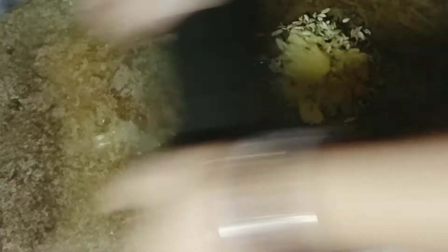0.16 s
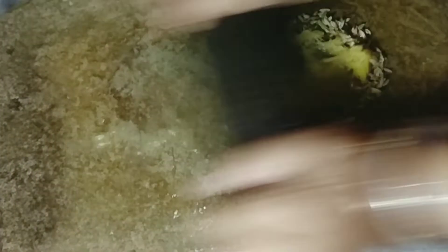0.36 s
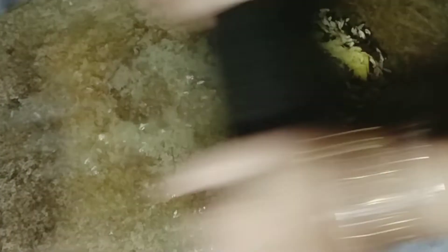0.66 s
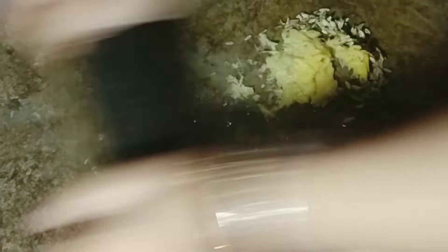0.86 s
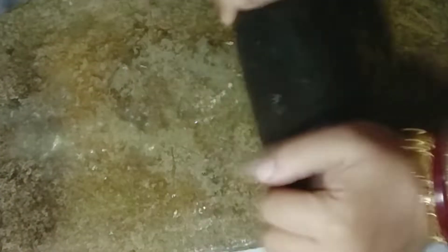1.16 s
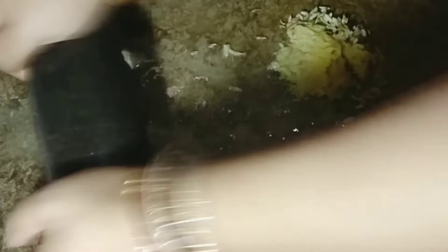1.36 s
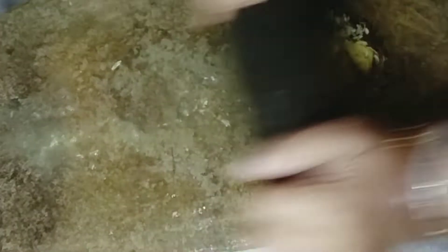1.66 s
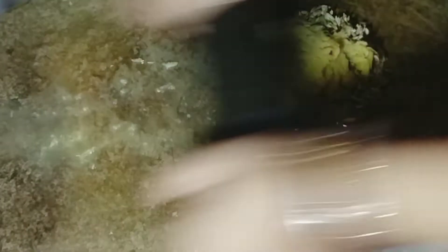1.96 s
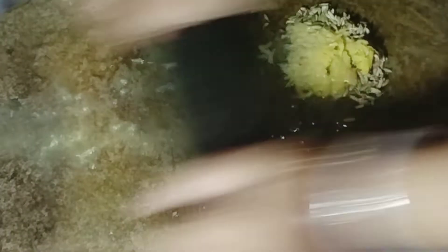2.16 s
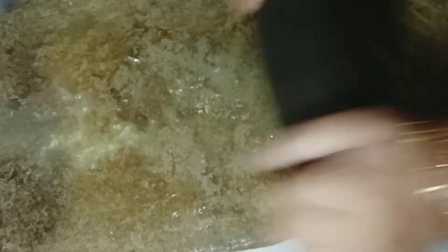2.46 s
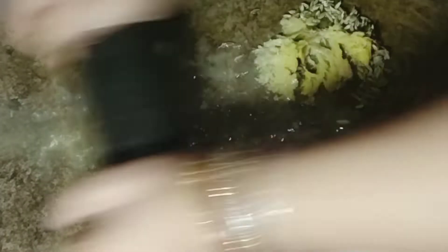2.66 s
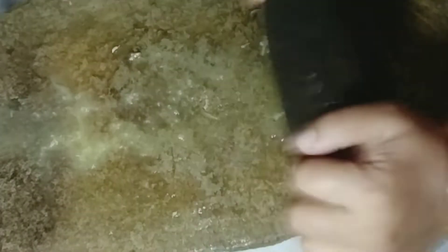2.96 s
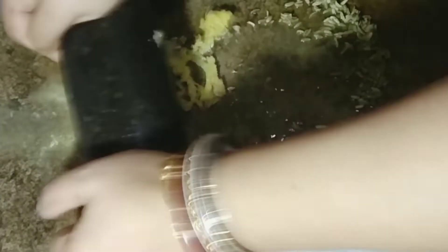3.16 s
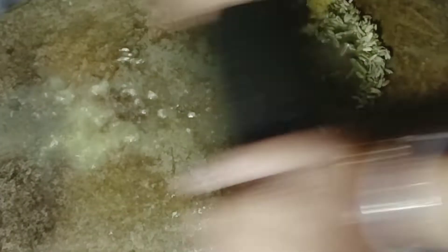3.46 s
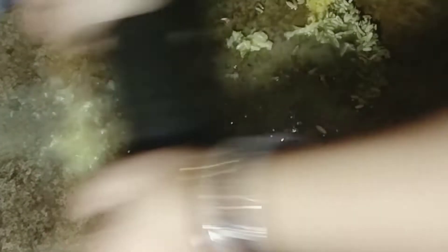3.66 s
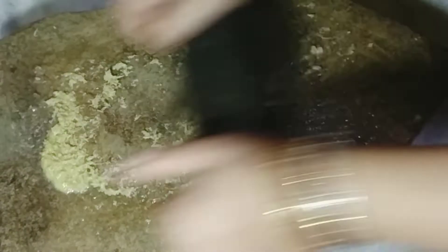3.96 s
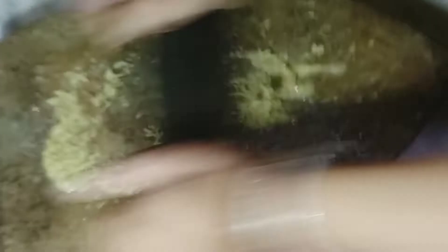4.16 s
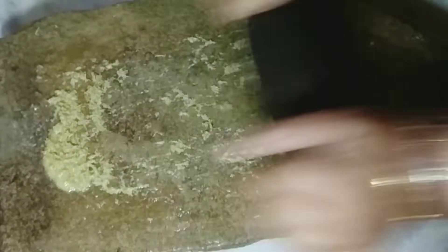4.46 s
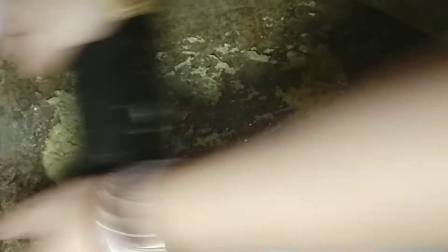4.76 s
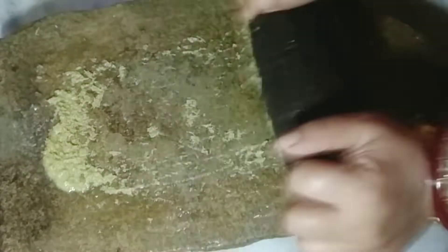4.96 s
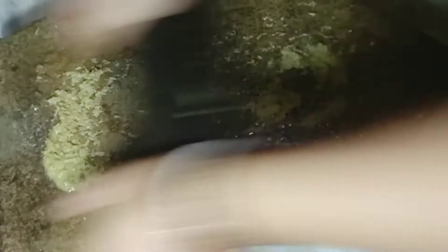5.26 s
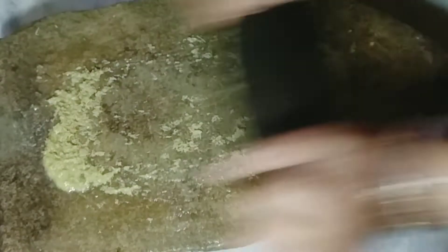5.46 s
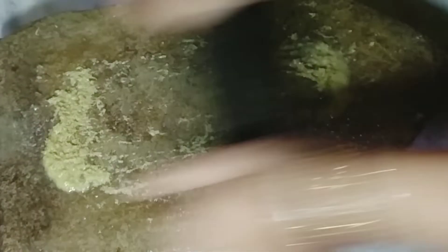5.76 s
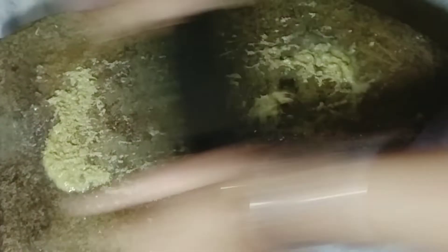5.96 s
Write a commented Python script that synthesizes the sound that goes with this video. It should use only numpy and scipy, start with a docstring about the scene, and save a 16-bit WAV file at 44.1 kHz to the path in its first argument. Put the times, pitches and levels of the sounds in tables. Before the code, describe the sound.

Rapid rhythmic stone-on-stone scraping and knocking crushes wet, gritty paste, with thin bangles rattling at each stroke over a low steady room hum.

```python
"""A small hard kitchen: a stone roller knocks and grinds to and fro over a stone slab, close to a phone.
Knocks, chatter and drags ring decaying modes of the stones; wet grit crackles as dense grains of noise.
The bangles on the wrists clash at the strokes: a tick, a spray of tiny hits and thin short rings.
A low steady hum fills the room and deep soft bursts of noise flutter under some strokes.
The two microphone ports hear each mode of the stones differently."""
import sys
import numpy as np
from scipy import signal
from scipy.fft import rfft, irfft, next_fast_len
from scipy.io import wavfile
from scipy.ndimage import uniform_filter1d

SR = 44100
rng = np.random.default_rng(int(sys.argv[2]) if len(sys.argv) > 2 else 0)


def store_pcm(level_fs):
    """Save levels as 16-bit WAV."""
    pcm = np.round(np.clip(level_fs, -1, 1) * 32767).astype(np.int16)
    wavfile.write(sys.argv[1], SR, np.atleast_2d(pcm).T)


N = 269353

# wet grit crushed at each push and pull: peak t/s, rise t/s, peak level/dB
STROKES = [(.03, 0.24, -54), (.2, 0.064, -27.5), (.47, 0.22, -48), (0.634, 0.06, -18.5), (.98, 0.064, -46),
           (1.09, 0.046, -22.5), (1.43, 0.035, -25.5), (1.53, 0.16, -31), (1.83, 0.15, -46),
           (1.99, 0.11, -17.5), (2.23, 0.026, -58), (2.429, 0.018, -20), (2.692, 0.078, -27.5),
           (2.891, 0.0074, -15), (3.22, 0.31, -40), (3.339, 0.014, -15), (3.649, 0.094, -32),
           (3.79, 0.11, -21.5), (3.977, 0.023, -12.5), (4.23, 0.26, -35), (4.316, 0.008, -17.5),
           (4.421, 0.047, -17), (4.68, 0.16, -29), (4.864, 0.022, -13.5), (5.14, 0.026, -60),
           (5.27, 0.11, -30), (5.34, 0.036, -14.5), (5.558, 0.045, -29), (5.72, 0.13, -27.5),
           (5.804, 0.076, -16), (6.07, 0.25, -51)]
# noise spectrum of grit and bangle hits, before colour() takes its share: f/Hz, level per Hz/dB
GRIT_SPECTRUM = [(100, -35), (600, -18), (1940, -13.5), (3300, -9.5), (3790, -8.5), (5490, -1.5), (6560, 1),
                 (6960, 4), (8210, -0.5), (9190, -0.5), (10500, -2.5), (14200, -9.5), (16000, -21)]
BODY_FALL = 165  # dB/s, fall of the crackle's body and of the bangle rattle


def undb(db):
    """Decibels to an amplitude factor."""
    return 10 ** (np.asarray(db) / 20)


def level(x, db):
    """Scale to an rms level."""
    return x * undb(db) / np.sqrt(np.mean(x ** 2))


def curves(table):
    """Columns of a table, interpolated to one value a sample."""
    s, *columns = np.transpose(table)
    return [np.interp(np.arange(N) / SR, s, c) for c in columns]


def colour(x, table, share=0.87):
    """Shape by a (Hz, dB) spectrum, using this share of each dB."""
    hz, db = np.transpose(table)
    size = next_fast_len(N + 4096)
    f = np.arange(size // 2 + 1) * SR / size
    gain = undb(share * np.interp(np.log(f + 1), np.log(hz), db))
    return irfft(rfft(x, size) * gain, size)[..., :N]


def split(x, hz):
    """Below and above a frequency."""
    return [signal.sosfilt(signal.butter(3, hz, kind, fs=SR, output="sos"), x) for kind in ("low", "high")]


def ring(x, hz, t60):
    """One mode as a turning pointer: a unit click rings with amplitude 1."""
    pole = np.exp(2j * np.pi * hz / SR - np.log(1000) / (t60 * SR))
    return signal.lfilter([1], [1, -pole], x)


def shifting(x, hz, t60, s, shares):
    """A mode whose pitch moves by a new share at each event."""
    event = np.searchsorted(s[1:] * SR, np.arange(N))
    turn = np.exp(2j * np.pi * hz / SR * np.cumsum(shares[event]))
    return turn * ring(x * np.conj(turn), hz, t60)


def clicks(times, sizes):
    """A click of each size at each time."""
    x = np.zeros(N)
    np.add.at(x, np.clip((np.asarray(times) * SR).astype(int), 0, N - 1), sizes)
    return x


def grains(rate, spread_db):
    """Random clicks, rate per second, a few much larger than the rest; rms 1."""
    sizes = undb(spread_db * np.minimum(rng.exponential(size=N), 4.5)) * rng.choice([-1, 1], N)
    return level(sizes * (rng.random(N) < rate / SR), 0)


def crackle(rate, spread_db, grain_s, edge_hz=10000, alike=0.072):
    """Grains of decaying noise, at one moment but in another shape at each port; below and above an edge."""
    power = signal.lfilter([1], [1, -np.exp(-1 / (grain_s * SR))], grains(rate, spread_db) ** 2)
    noise = rng.standard_normal((3, N))
    pair = np.sqrt(power) * (noise[1:] + alike * noise[0])
    return [level(band, 0) for band in split(colour(pair, GRIT_SPECTRUM), edge_hz)]


def swells(peak_s, rise_s, db, fall_db_per_s):
    """Gain over time: each event climbs 20 dB in its rise time, peaks and falls away; powers add."""
    step = 32  # samples between computed gains
    rise_db = 20
    lag = np.arange(0, N + step, step)[:, None] / SR - peak_s
    down = np.where(lag < 0, -lag * rise_db / np.maximum(rise_s, .002), lag * fall_db_per_s)
    power = np.sum(undb(2 * (db - down)), axis=1)
    return np.interp(np.arange(N), np.arange(len(power)) * step, np.sqrt(power))


def patchy(x, depth_db, hold_s, width_hz):
    """The colour shifts from moment to moment in random patches, alike at both ports."""
    size = 256  # samples a frame
    z = signal.stft(x, nperseg=size)[2]
    steps = [max(int(width_hz * size / SR), 1), max(int(hold_s * SR / size * 2), 1)]
    field = rng.standard_normal(z.shape[1:])
    for axis in (0, 1):
        for _ in range(2):
            field = uniform_filter1d(field, steps[axis], axis=axis)
    gain = undb(depth_db * field / field.std())
    return signal.istft(z * gain / np.sqrt(np.mean(gain ** 2)), nperseg=size)[1][:, :N]


def hum():
    """Steady room sound: coloured noise, alike at both ports in the bass."""
    # noise spectrum, before colour() takes its share: f/Hz, level per Hz/dB
    hum_spectrum = [(15, -54), (25, -35), (69, -28), (115, -4), (184, 0), (500, -8.5), (665, -29),
                    (907, -14), (1130, -23.5), (2700, -17.5), (3750, -47), (5000, -34), (6500, -62),
                    (11000, -120)]
    mid, side = colour(rng.standard_normal((2, N)), hum_spectrum)
    side = undb(-19) * side + split(side, 1300)[1]
    return level(np.array([mid + side, mid - side]), -45)


def grit():
    """Dense wet crackle under the roller; harder crushing tilts it toward the top."""
    # the paste never stops hissing under the roller: t/s, level of the top/dB
    slide_hiss = [(0, -29.5), (.35, -42.5), (.56, -34), (.79, -50.5), (.82, -32.5), (.9, -38.5),
                  (1.03, -38), (1.2, -42.5), (1.33, -34.5), (1.6, -38.5), (1.76, -37.5), (2.15, -41),
                  (2.4, -33), (2.6, -43), (2.8, -33.5), (3.06, -43.5), (3.25, -34.5), (3.5, -40),
                  (3.9, -40), (4.15, -41.5), (4.55, -40), (5.05, -38), (5.5, -38.5), (6.11, -33.5)]
    slide_body_db = -2.5  # body of the hiss over its top
    body_share, body_db = 0.54, -21  # the body gains this share of each dB, from this level at 0 dB
    crush_fall = 222  # dB/s, top
    s, rise_s, db = np.transpose(STROKES)
    low, high = crackle(1500, 2.5, 0.0011)
    # single seeds cracking, against the dense crackle
    seeds = crackle(150, 4.2, 0.00084)
    seed_gain = undb(-11)
    low, high = low + seed_gain * seeds[0], high + seed_gain * seeds[1]
    slide = undb(curves(slide_hiss)[0])
    body = undb(slide_body_db) * slide + swells(s, rise_s, body_db + body_share * db, BODY_FALL)
    top = slide + swells(s, rise_s, db, crush_fall)
    return body * low + top * high


def drags():
    """The roller scrapes under the weight of the hands: force on the deepest, lower and middle modes."""
    # peak t/s, force level on the lower modes/dB, on the deepest modes/dB
    drag_strokes = [(0, -58.5, -56), (0.188, -59, -51), (.33, -51, -57), (.61, -61, -44), (.8, -48.5, -46),
                    (1.06, -72, -93), (1.21, -52, -44), (1.32, -64, -49), (1.63, -51.5, -42),
                    (1.93, -74, -74), (2.123, -46.5, -43.5), (2.42, -54.5, -51), (2.599, -57.5, -44.5),
                    (2.868, -76, -76.5), (3.02, -56, -50.5), (3.31, -59.5, -50), (3.47, -53, -43.5),
                    (3.74, -69, -53), (3.93, -53, -45), (4.118, -59.5, -48), (4.342, -65, -43),
                    (4.578, -59, -42.5), (4.84, -58.5, -48), (5.05, -62, -40), (5.318, -54, -43),
                    (5.5, -68, -47), (5.759, -52, -52), (5.931, -56, -37), (6.02, -85, -43)]
    rise_s, fall = 0.13, 191  # s, dB/s
    middle_db = -3  # middle modes against the lower ones
    peak_s, lower_db, deep_db = np.transpose(drag_strokes)
    scrape = grains(900, 4.2)
    deep, lower = [scrape * swells(peak_s, rise_s, db, fall) for db in (deep_db, lower_db)]
    return deep, lower, undb(middle_db) * lower


def chatter(s, blows_db, wet_db):
    """After each knock the roller chatters on: small slips force each group of modes and die away."""
    below_db, rise_s, fall = -33, 0.022, 109  # dB against the blow, s, dB/s
    slips = grains(500, 3.14) * undb(wet_db)
    return slips * np.array([swells(s + rise_s, rise_s, db + below_db, fall) for db in blows_db])


def crack(contact):
    """The dry crack of contact: very short modes, alike at both ports."""
    # f/Hz, level against the upper modes/dB, t60/s
    crack_modes = [(1040, -10, .004), (2150, 5, 0.0042), (2780, -2, 0.0026)]
    return -sum(undb(db) * ring(contact, hz, t60).imag for hz, db, t60 in crack_modes) * np.ones((2, 1))


def stones(scatter_db=3.5, push_hz=4500):
    """Each knock lands elsewhere and stirs the modes its own way; chatter and drags slip into the same modes."""
    # knocks of roller on slab: t/s, level on the middle modes/dB, upper modes/dB, lower modes/dB
    knocks = [(.002, -26, -29.5, -27.5), (.134, -13.5, -14, -24.5), (.159, -8, -11, -33),
              (0.173, -7, -43, -42), (0.18, -13, -38, -22.5), (0.216, -32, -24, -23), (0.24, -17, -28, -24),
              (.267, -17.5, -25, -41), (0.278, -17, -37, -25), (0.31, -20, -23, -33),
              (0.333, -19, -30, -41), (.369, -15.5, -22, -19), (0.551, -18, -21.5, -26.5),
              (.583, -13.5, -22.5, -23), (0.61, -22, -36, -50), (0.7, -18, -35, -27),
              (0.722, -10.5, -28, -27), (.755, -11, -21.5, -19), (.764, -13, -24, -34),
              (.781, -23, -28, -22), (.806, -9, -8, -19.5), (.818, -32, -45, -36), (0.919, -18, -12.5, -23),
              (.995, -16, -16.5, -26), (1.011, -19, -34, -41), (1.040, -10, -24, -21.5),
              (1.053, -25, -33, -25), (1.176, -8, -24, -18), (1.203, -18, -19.5, -18.5),
              (1.459, -15, -22, -28), (1.478, -12, -14, -38), (1.496, -10.5, -7, -23.5),
              (1.507, -32, -28, -27), (1.541, -18.5, -18.5, -28), (1.608, -8, -23, -33),
              (1.618, -16, -23, -24), (1.639, -12, -32, -29), (1.66, -15, -20.5, -25),
              (1.686, -30, -38, -26), (1.715, -43, -37, -26), (1.719, -26, -44, -44), (1.852, -13, -7, -23),
              (1.905, -10.5, -8, -19.5), (1.949, -21, -19, -23.5), (2.052, -13, -28, -40),
              (2.086, -14, -22.5, -29), (2.119, -17, -21.5, -28), (2.129, -15.5, -19.5, -38),
              (2.303, -24, -14, -27), (2.394, -10, -6, -33), (2.508, -17, -29, -24),
              (2.516, -12.5, -27, -21), (2.586, -25, -30, -26.5), (2.842, -10, -14.5, -28),
              (2.858, -17, -42, -19), (2.954, -20, -42, -28), (2.972, -18.5, -44, -28),
              (2.997, -19.5, -29, -30), (3.036, -26, -35, -29.5), (3.251, -21.5, -22, -29),
              (3.288, -25, -29, -26), (3.296, -17, -34, -34), (3.402, -20, -34, -31),
              (3.411, -12, -21.5, -20), (3.442, -14, -31, -52), (3.48, -35, -33, -28),
              (3.652, -53, -29.5, -62), (3.722, -8, -10, -26), (3.732, -14.5, -39, -24),
              (3.745, -17.5, -27, -26), (3.835, -25, -43, -56), (3.864, -8.5, -28.5, -21),
              (3.89, -17.5, -22, -21), (4.314, -36, -28.5, -34.5), (4.344, -25.5, -30, -52),
              (4.391, -20, -20.5, -26), (4.395, -13.5, -20, -15.5), (4.402, -31, -43, -26.5),
              (4.574, -29, -45, -35), (4.852, -13.5, -21, -23), (5.014, -29, -39, -23),
              (5.306, -13.5, -22, -16.5), (5.315, -41, -30, -26), (5.71, -26, -59, -28.5),
              (5.75, -12, -18, -21.5), (5.761, -30, -20.5, -27), (5.875, -33, -54, -31),
              (5.903, -42, -52, -32)]
    # modes of the stones: f/Hz, level/dB, t60/s, right port's lead/rad, change once coated in paste/dB
    stone_modes = [(136.8, -26, 0.37, 0.55, 0), (209.6, -17, 0.087, 0.47, 1),
                   (292, -12, 0.086, 0.18, -16.5), (357.4, -4, 0.075, 0.044, -6.5),
                   (416.4, -4.5, 0.11, 0.14, -14), (441, -2, 0.015, 0.17, 2), (475, 1, 0.04, 0.072, -1.5),
                   (521.6, -8.5, 0.064, 0.14, 9.5), (566, -1.5, 0.047, 0.57, 1.5),
                   (675, -3, 0.0093, 1.7, 1), (658, -2, 0.011, 1.37, 3.5), (738, -7.5, 0.053, 1.32, 6.5),
                   (807, 0, 0.026, 2.42, -3), (816, -10.5, 0.09, 2.58, 7), (874, -5.5, 0.037, 1.3, 3.5),
                   (919.7, 1.5, 0.075, 1.58, -4), (939.6, 1.5, 0.033, 2.68, -5),
                   (1005.7, 6, 0.024, 0.54, -6.5), (1017.2, 4, 0.04, 0.37, -10),
                   (1217, 1, 0.01, 2.2, -14.5), (1283, -11, 0.042, 0.63, 10), (1482, -1, 0.022, 1, -3),
                   (1652, -2.5, 0.021, 2.1, -4), (1733, -0.5, 0.03, 0.33, -16), (1700, 1, 0.029, 7.1, -21),
                   (1886, -6, 0.034, 0.36, -18), (1880, 7.5, 0.012, 1.5, -11),
                   (2130, -8.5, 0.017, 0.25, 12), (2240, -2.5, 0.0076, 1.04, 4.5),
                   (2350, -5, 0.02, 1.9, -8), (2530, -10, 0.035, 0.74, -16), (2640, -13.5, 0.027, 2.3, -14),
                   (2890, -7.5, 0.027, 1.6, -7), (3120, -15.5, 0.0028, 6, -18)]
    # spice paste spreads under the roller: t/s, share of the stone coated/0-1, chatter level/dB, crack level/dB
    paste = [(0, 0.31, -8, -5), (1.3, 0.23, -10, -2.5), (2.7, 0.13, -10, 1), (3.3, 0.28, -12, 2),
             (3.95, 0.37, -8.5, 4), (4.2, 0.62, -7, -15), (6.11, 1, -13.5, -13)]
    s, middle, upper, lower = np.transpose(knocks)
    groups_db = (lower, middle, upper)
    coated, wet_db, crack_db = curves(paste)
    rubs = chatter(s, groups_db, wet_db)
    rub_deep, drag_lower, drag_middle = drags()
    rubs[0] += drag_lower
    rubs[1] += drag_middle
    # the place of contact scatters each mode's blow and shifts its pitch by a small share
    chance = np.clip(rng.standard_normal((len(s), len(stone_modes))), -2, 1.3)
    shift = 0.011 * rng.standard_normal((len(s), len(stone_modes)))
    contact = split(clicks(s, undb(upper)) * undb(crack_db), 650)[1]
    out = crack(contact)
    for k, (hz, mode_db, t60, lead, coated_db) in enumerate(stone_modes):
        group = (hz > 700) + (hz > 1250)  # 0 lower, 1 middle, 2 upper
        blow = clicks(s, undb(groups_db[group] + scatter_db * chance[:, k]))
        rub = rub_deep if hz < 320 else rubs[group]
        force = (blow + rub) * undb(coated_db * np.clip(coated, 0, 1))
        # each port hears the mode at its own phase; signs alternate from mode to mode
        turn = (-1) ** k * undb(mode_db) * np.exp(.5j * lead * np.array([[-1], [1]]))
        out = out + (turn * shifting(force, hz, t60, s, shift[:, k])).imag
    out = split(out, 116)[1]
    return split(split(out, push_hz)[0], push_hz)[0]


def clash_spray(s, db, bright_db):
    """A spray of tiny hits after each clash, dying away sooner at the top."""
    body_t60, top_t60 = 0.19, 0.067  # s
    low, high = crackle(3300, 5.3, 0.00079)
    t = np.arange(SR // 8) / SR

    def tails(tail_db, t60):
        return signal.oaconvolve(clicks(s, undb(tail_db)), np.exp(-np.log(1000) * t / t60))[:N]

    return 0.22 * tails(db, body_t60) * low + tails(db + bright_db, top_t60) * high


def clash_ticks(s, db, bright_db, tick_db):
    """The first contact of each clash: a burst of coloured noise with a 2.5 ms decay constant."""
    t = np.arange(SR // 8) / SR
    hits = clicks(s, undb(db + np.clip(bright_db, -8, 12) + tick_db))
    tick = signal.oaconvolve(hits, np.exp(-t / .0025))[:N]
    return tick * level(colour(rng.standard_normal((2, N)), GRIT_SPECTRUM), 0)


def wrist_rattle(rattle_db):
    """The shaking wrists keep the rings rattling through each stroke: random clicks that swell with it."""
    peak_s, rise_s, crush_db = np.transpose(STROKES)
    return undb(rattle_db) * grains(720, 3.3) * swells(peak_s, rise_s, crush_db, BODY_FALL)


def bangles(ring_db=-22, tick_db=2, rattle_db=-46):
    """A stack of rings clashes: tick, spray, and thin short modes rung by the clashes and the rattle."""
    # bangle clashes: t/s, peak level/dB, brightness/dB
    clashes = [(0.028, -31, 19.5), (0.094, -16.5, -13), (0.18, -16, -6), (0.197, -28.5, 11),
               (0.413, -26, -1), (0.43, -34, 1), (0.457, -24.5, -5), (0.504, -17.5, -21),
               (0.524, -19.5, -9), (0.605, -10, -8), (0.81, -36.5, -5), (0.846, -33, -4.5),
               (0.915, -34.5, 10.5), (0.938, -28, 9), (0.978, -43, 4), (0.984, -19, 1),
               (1.0582, -25.5, 6.5), (1.077, -23, 12.5), (1.366, -39, 20.5), (1.3954, -29, 8),
               (1.427, -22, 6), (1.5264, -22.5, 7.5), (1.673, -28, -2), (1.7995, -42.5, 21),
               (1.8297, -24, -7), (1.855, -22, -4), (1.917, -30, -8), (1.929, -32.5, -5), (1.936, -13, -17),
               (1.955, -18, 0), (1.9737, -29.5, 16), (1.984, -38, 20), (2.152, -49, 20),
               (2.1982, -24.5, 2.5), (2.224, -40, 21), (2.3366, -23.5, -6), (2.413, -16.5, 4),
               (2.578, -36, -4), (2.6375, -29, 1), (2.664, -27.5, 6), (2.683, -37, 22), (2.693, -29, 2),
               (2.876, -9.5, 0), (2.902, -38, -4), (2.935, -30.5, 10), (2.948, -33, 7), (3.097, -25, -7.5),
               (3.204, -40, 1), (3.2151, -15, -12), (3.3257, -21, 7), (3.3355, -45, 13),
               (3.6197, -25.5, 0.5), (3.649, -16.5, -9), (3.731, -23, -11), (3.756, -16.5, 1),
               (3.7777, -16, 1.5), (3.9598, -15, 1), (4.03, -38, 9), (4.18, -19.5, -9), (4.229, -29, 4),
               (4.314, -20.5, -8.5), (4.319, -21, 0), (4.338, -12.5, -20), (4.408, -12.5, -7),
               (4.634, -19, 1), (4.669, -28, 7), (4.6806, -31, 8), (4.697, -36, 18), (4.752, -40, 17),
               (4.777, -19.5, -5), (4.805, -17, -3), (4.834, -26, 4), (4.8497, -15, -11), (4.8632, -23, -4),
               (4.9856, -34, 5), (5.034, -25, -8), (5.118, -36.5, 10), (5.13, -22.5, 3.5), (5.187, -55, -3),
               (5.208, -36.5, 15), (5.215, -37, 8), (5.2666, -18, 0), (5.3053, -12, -6), (5.331, -31.5, 21),
               (5.432, -39, 6), (5.55, -31, 8.5), (5.56, -20.5, 1.5), (5.611, -41, 5), (5.621, -27, 8),
               (5.693, -20, -3), (5.728, -13, -11), (5.771, -20, 1), (5.7919, -29, -4), (5.8002, -29, 8.5),
               (5.918, -41, 11), (6.007, -19.5, -4), (6.057, -38, 22)]
    # modes of the bangles: f/Hz, level/dB, t60/s
    bangle_modes = [(6570, 9, 0.035), (7700, 4, 0.03), (8300, 10, 0.03), (10100, 13, 0.025),
                    (10660, 15, 0.04), (11400, 9, 0.023), (12730, 11, .02)]
    s, db, bright_db = np.transpose(clashes)
    out = clash_spray(s, db, bright_db) + clash_ticks(s, db, bright_db, tick_db)
    rattle = wrist_rattle(rattle_db)
    scatter_db = 4 * np.clip(rng.standard_normal((len(s), len(bangle_modes))), -2, 1.5)
    # another pair of rings meets each time, so the pitch moves by a small share
    shift = .025 * rng.standard_normal((len(s), len(bangle_modes)))
    for k, (hz, mode_db, t60) in enumerate(bangle_modes):
        blows = clicks(s, undb(db + np.minimum(bright_db, 0) + ring_db + scatter_db[:, k]))
        force = blows + np.roll(rattle, k * 7)  # the rattle is staggered by 7 samples a mode
        rings = undb(mode_db) * shifting(force, hz, t60, s, shift[:, k])
        out += [rings.imag, rings.real]  # a quarter cycle apart at the two ports
    return out


def kitchen(x, t60, db, gap_s):
    """Reflections: a decaying noise response after a short gap, different at each port."""
    t = np.arange(SR // 4) / SR
    tail = rng.standard_normal((2, len(t))) * np.exp(-np.log(1000) * t / t60) * (t >= gap_s)
    tail = tail / np.sqrt(np.sum(tail ** 2, axis=1, keepdims=True))
    return undb(db) * signal.oaconvolve(x[None], tail, axes=1)[:, :N]


def deep_bursts():
    """Deep soft bursts under some strokes: low noise flutter, partly alike at the two ports."""
    # peak t/s, level/dB
    bursts = [(0.059, -47), (.21, -44), (.61, -58), (.81, -56), (1.06, -57), (1.62, -56), (2.4, -64),
              (2.87, -52), (3.39, -49), (3.73, -63), (4.41, -59), (5.32, -58), (5.77, -58)]
    rise_s, fall = 0.097, 400  # s, dB/s
    peak_s, db = np.transpose(bursts)
    noise = rng.standard_normal((3, N))
    noise = noise[2] + 0.2 * noise[:2]
    flutter = split(split(noise, 60)[0], 38)[1]
    return level(flutter, 0) * swells(peak_s, rise_s, db, fall)


def ports(pair):
    """The two ports differ in colour: each takes half the difference, with opposite sign."""
    # f/Hz, level left minus right/dB
    port_colour = [(300, -3.5), (4400, -0.5), (8500, -1), (11000, 7), (15000, 8.5)]
    return np.array([colour(pair[0], port_colour, .5), colour(pair[1], port_colour, -.5)])


def scene():
    """Stones, grit and bangles with their reflections, over the hum and the deep bursts."""
    low = stones()
    high = patchy(grit(), 3.5, .015, 2500) + bangles()
    stone_walls = kitchen(split(low[0], 527)[1], 0.22, -2, 0.0051)
    walls = stone_walls + kitchen(high[0], 0.087, -1.5, 0.0018)
    # long waves reach both ports alike
    mid, side = (low[0] + low[1]) / 2, split((low[0] - low[1]) / 2, 180)[1]
    return mid + [side, -side] + ports(high + walls) + hum() + deep_bursts()


def record(dry):
    """The level dips briefly once; the phone rounds the loudest peaks and cuts the top."""
    # everything falls almost silent for a moment: from t/s, to t/s, level/dB
    dropout = (3.932, 3.939, -24)
    edge_s, top_hz = .001, 15900
    start, stop, db = dropout
    gain = undb(np.interp(np.arange(N) / SR, [start - edge_s, start, stop, stop + edge_s], [0, db, db, 0]))
    dipped = gain * dry
    soft = dipped / (1 + dipped ** 4) ** .25
    return signal.sosfilt(signal.ellip(12, .2, 90, top_hz, fs=SR, output="sos"), soft)


dry = scene()
out = record(dry)
store_pcm(out)
```